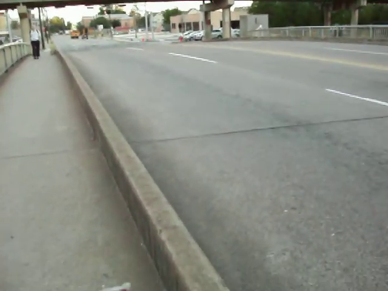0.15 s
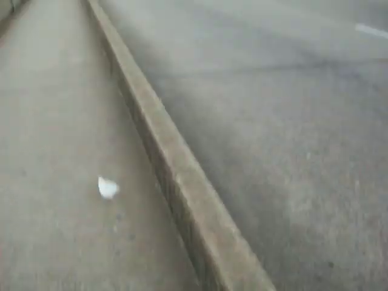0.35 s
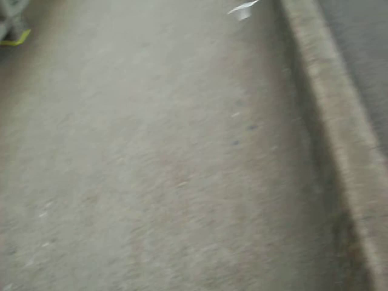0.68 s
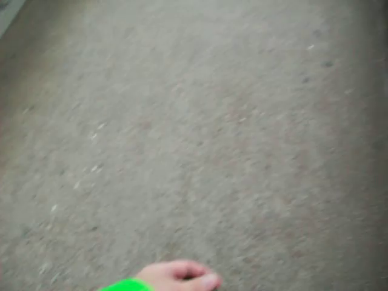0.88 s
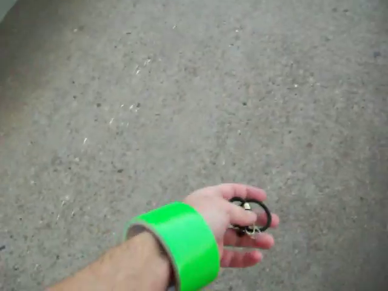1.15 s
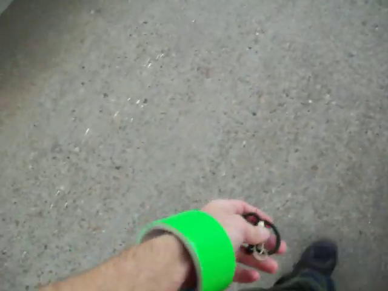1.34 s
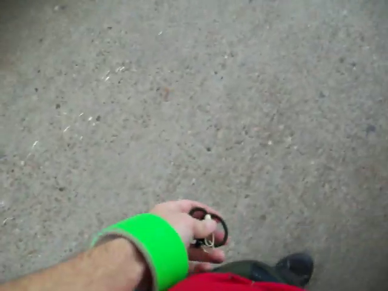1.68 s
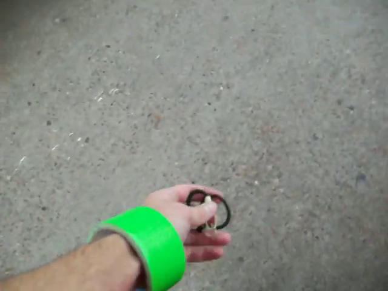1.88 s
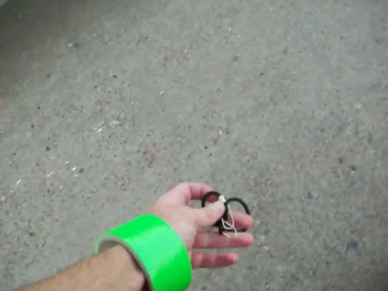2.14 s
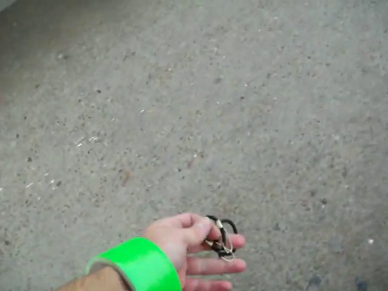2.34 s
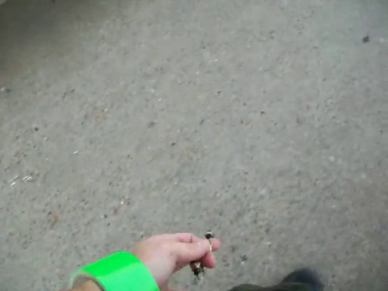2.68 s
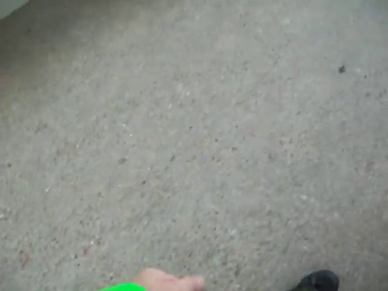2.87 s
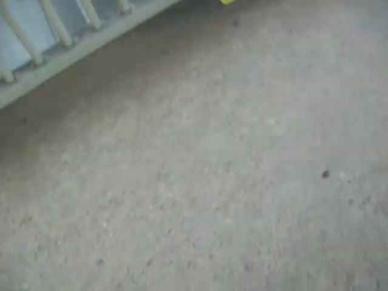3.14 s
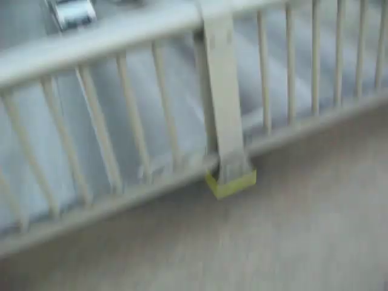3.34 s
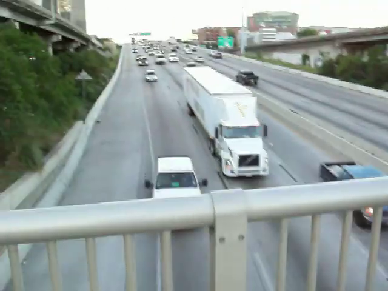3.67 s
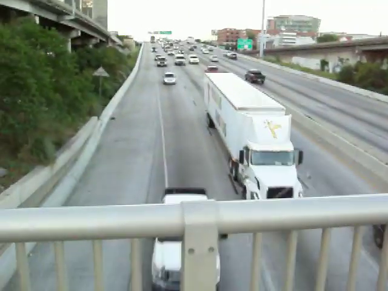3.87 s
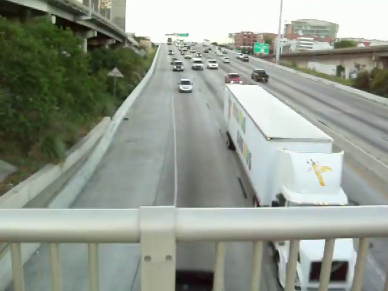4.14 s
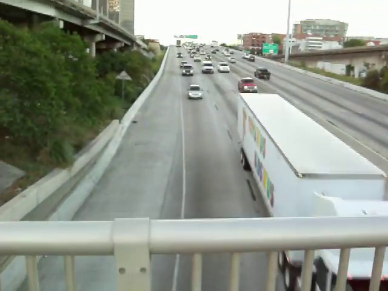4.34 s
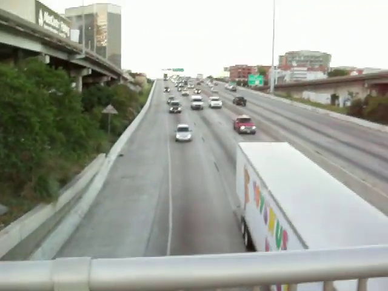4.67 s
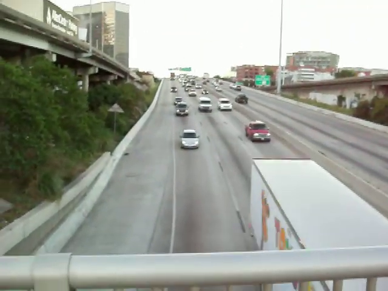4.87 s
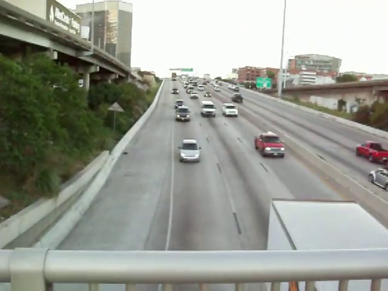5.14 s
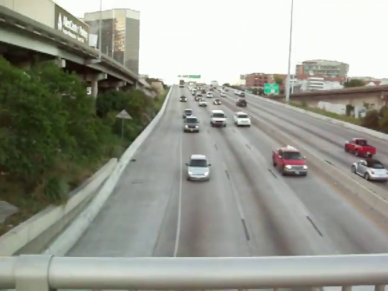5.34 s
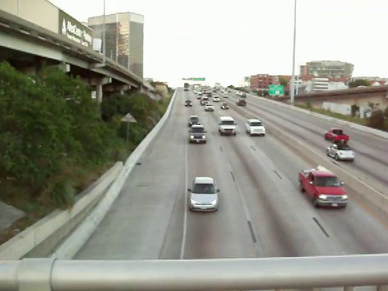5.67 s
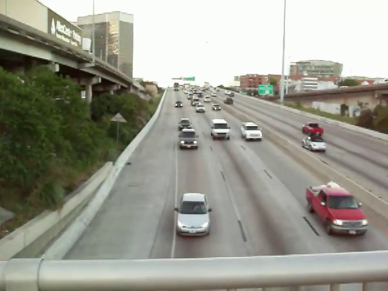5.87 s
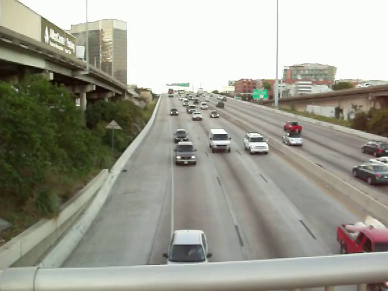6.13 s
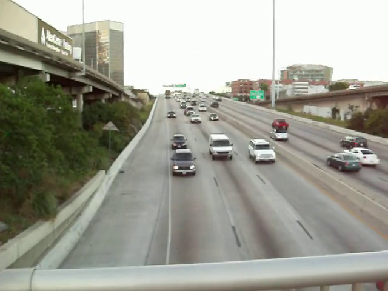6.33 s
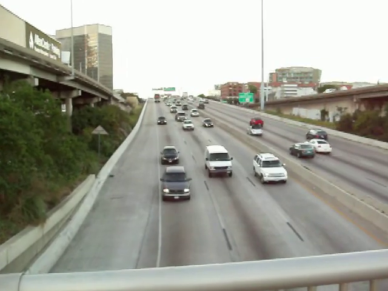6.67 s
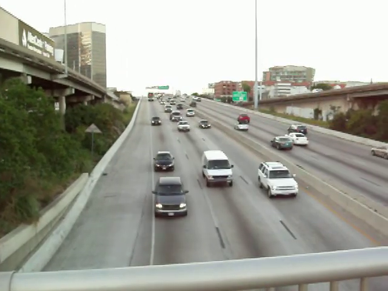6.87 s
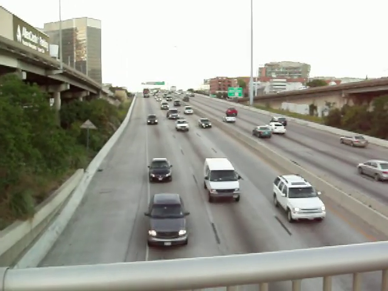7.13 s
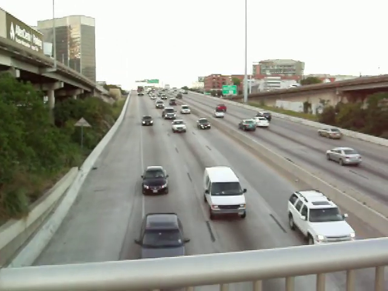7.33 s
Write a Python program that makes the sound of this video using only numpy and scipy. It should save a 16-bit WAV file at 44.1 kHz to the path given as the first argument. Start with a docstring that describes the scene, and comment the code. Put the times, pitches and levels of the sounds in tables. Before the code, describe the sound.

Dense freeway traffic roars steadily beneath an overpass, with singing tyres, a low diesel drone, faint key rustles and small overload clicks.

```python
"""Dense freeway traffic under an overpass: coloured noise bands roar throughout, tyres sing near 900 Hz,
and a diesel truck drones in harmonics, sinking from 117 to 98 Hz. Large vehicles swell in from the start;
the bridge deck dulls the lanes around 2.4 s, grainy noise rings as keys rustle in a hand from 3.3 to 3.7 s,
and a semi-trailer dulls the lanes around 4.6 s. A small camera holds the level steady, keeps mainly
the band below 6 kHz and ticks at set moments from 0.8 to 6.6 s, where the wave is driven into overload."""
import sys
import numpy as np
from scipy import signal
from scipy.fft import rfft, irfft
from scipy.io import wavfile
from scipy.ndimage import uniform_filter1d

SR = 44100
rng = np.random.default_rng(int(sys.argv[2]) if len(sys.argv) > 2 else 0)


def store_wav(level_fs):
    """Save 16-bit WAV to argv[1]."""
    pcm = np.round(np.clip(np.atleast_2d(level_fs), -1, 1) * 32767)
    wavfile.write(sys.argv[1], SR, pcm.T.astype(np.int16))


N = 330750
TIME = np.arange(N) / SR
FREQS = np.fft.rfftfreq(N, 1 / SR) + 1e-3  # the offset keeps the logarithm finite at 0 Hz

# All levels are those of the mix, ahead of the camera's gain control.
# A length spans the two points where a swell is 6 dB down.

# spectral shape of the whole stream of traffic: [f/Hz, relative level/dB]
ROAD_COLOUR = [(12, -24.5), (22, -8.5), (70, -7), (115, -3.5), (165, -8), (240, -7.5), (430, -10.5),
               (740, -9), (900, -4.5), (1020, -9), (1170, -17.5), (1450, -19.5), (1800, -28.5)]
# spectral shape of air pumped out of the treads: [f/Hz, relative level/dB]
HISS_COLOUR = [(1000, -23), (1700, -1.5), (2100, 1), (2700, 2), (3250, -6.5), (3850, -8), (4400, -14),
               (5100, -17.5), (5800, -16.5)]
# steady levels of the stream of traffic, level/dB
RUMBLE_DB, BODY_DB, TYRE_DB, HISS_DB = -28, -27, -20.5, -35
# low roar of single large vehicles: [closest t/s, length t/s, rumble level/dB, body roar level/dB]
LARGE_VEHICLES_PASSING = [(.35, 0.79, -29.5, -25.5), (1.1, 0.38, -29.5, -26), (2.499, 2.2, -35, -23),
                          (4.001, 1.62, -24.5, -29.5), (5.45, .35, -25, -38), (6.15, 0.83, -29, -34)]
# the bridge deck screens the lanes below from the walkway: deepest t/s, length t/s
SCREEN_S, SCREEN_LENGTH_S = 2.4, 2.2
# the semi-trailer screens the lanes behind it: deepest t/s, length t/s
TRAILER_S, TRAILER_LENGTH_S = 4.55, 1.7
# diesel exhaust: [t/s, firing rate f/Hz, level/dB before the trim in diesel()]
DIESEL_EXHAUST = [(0.0, 116.9, -23), (0.24, 116.4, -30.5), (0.72, 103.1, -22), (0.96, 106.0, -29.5),
                  (1.08, 106.1, -30), (1.32, 107.4, -21.0), (1.92, 107.8, -24.5), (2.64, 101.5, -21),
                  (3.48, 103.3, -25.5), (3.6, 103.0, -31.5), (4.32, 100.3, -20.5), (4.56, 100.6, -31.5),
                  (4.8, 99.4, -18), (5.4, 98.4, -24.5), (5.88, 98.8, -23.5), (6.12, 98.6, -35.5),
                  (6.48, 99.2, -23.5), (6.6, 98.2, -32), (7.2, 99.2, -23.5), (7.49, 98.2, -25.5)]
# other engines humming by: [loudest t/s, length t/s, pitch f/Hz, glide Hz/s, width f/Hz, level/dB]
ENGINE_HUMS = [ (0.144, 1.2, 126.6, -9, 16, -32), (1.6, 1, 301, 0, 19, -32),
               (2.449, 1.07, 334.6, -3, 2, -28.5), (2.3, .8, 327.7, -20, 110, -29),
               (3.1, .8, 580, -60, 83, -27.5), (3.55, 0.81, 279.5, -25, 40, -30),
               (4.294, 0.34, 66, 8.5, 12, -32), (4.495, .6, 354, 1.5, 70, -29.5),
               (6.8, 1.8, 315, -5, 60, -34), (5.801, 2.2, 122.3, 6, 11, -29.5),
               (6.7, 2, 224.6, -5, 75, -27.5)]
# tyre treads singing by: [loudest t/s, length t/s, pitch f/Hz, level/dB]
TREAD_TONES = [(.3, .46, 734, -27.5), (0.799, .42, 912, -22.5), (1.494, 0.32, 906, -25),
               (2.0, 2.1, 859.8, -26.5), (2.198, 0.4, 901, -25), (3.548, 0.41, 948, -26.5),
               (4.5, 0.55, 960, -30), (5.15, 0.99, 828, -27), (6.6, 1.0, 943, -26.5),
               (6.799, 0.39, 848, -24.5)]
# every tread tone is equally unsteady and sinks with the Doppler shift
TREAD_WIDTH_HZ, TREAD_SAG_HZ_PER_S = 15, 12
# close tyres sizzling past: [loudest t/s, length t/s, centre f/Hz, width f/Hz, level/dB]
TYRE_SIZZLES = [(0.197, 0.9, 2280, 700, -37.5), (.88, 0.6, 2250, 704, -34.5), (2.197, .5, 2310, 500, -39.5),
                (3.62, 0.5, 2890, 400, -38.5), (5.4, .5, 3770, 1630, -48.5), (6.904, 1.4, 3620, 1400, -50)]
# keys shifting in the hand: [loudest t/s, length t/s, pitch f/Hz, level/dB]
KEY_RINGS = [(3.296, 0.068, 4800, -34.5), (3.423, 0.084, 5200, -36), (3.54, 0.07, 4620, -32.5),
             (3.686, 0.12, 4860, -43)]
# crests that overload the camera: [t/s, converter samples that wrap around]
OVERLOAD_TICKS = [(.8371, 1), (1.3816, 1), (2.4397, 1), (3.8099, 2), (4.07082, 2), (4.07108, 1),
                  (5.0949, 2), (5.3748, 2), (5.66, 1), (6.039, 1), (6.6104, 1)]
# the camera: largest wave value, band edge of the converter f/Hz, final top cut f/Hz
FULL_SCALE, BAND_HZ, TOP_HZ = .72, 5550, 15900


def traffic(far_db=-29.0, far_share=0.76, flicker_db=1.32, hiss_flicker_db=1.63):
    """Many vehicles blend into rumble, body roar, tyre roar and hiss; moving air makes each part flicker."""
    rumble, body, tyres, hiss = flow()
    far = far_db + far_share * (rumble - RUMBLE_DB)  # rises partly with the rumble
    road = colour(ROAD_COLOUR)
    parts = [
        (road * below(90), rumble),
        (road * above(100) * below(255), far),
        (road * above(258) * below(772), body),
        (road * above(751) * below(1830), tyres)]
    mix = np.zeros(N)
    for gain, db in parts:
        mix += noise(gain) * undb(db + flicker_db * walk(49))
    tread_air = noise(colour(HISS_COLOUR) * above(1200))
    return mix + tread_air * undb(hiss + hiss_flicker_db * walk(28))


def flow(deck_tyre_db=-1.5, deck_hiss_db=-2.0, trailer_tyre_db=-2.0, trailer_hiss_db=-1.1):
    """Levels in dB of the stream: large vehicles add low power, obstacles screen the highs."""
    rumble_power, body_power = undb(RUMBLE_DB) ** 2, undb(BODY_DB) ** 2
    for s, length, rumble_db, body_db in LARGE_VEHICLES_PASSING:
        approach = swell(s, length)
        rumble_power = rumble_power + (undb(rumble_db) * approach) ** 2
        body_power = body_power + (undb(body_db) * approach) ** 2
    deck = swell(SCREEN_S, SCREEN_LENGTH_S)
    trailer = swell(TRAILER_S, TRAILER_LENGTH_S)
    tyres = TYRE_DB + deck_tyre_db * deck + trailer_tyre_db * trailer
    hiss = HISS_DB + deck_hiss_db * deck + trailer_hiss_db * trailer
    return 10 * np.log10(rumble_power), 10 * np.log10(body_power), tyres, hiss


def diesel(rough=0.18, wander_hz=0.8, second_db=-16, third_db=-19, trim_db=-1.15):
    """The exhaust drones at the firing rate with weak overtones; reflections off the road make it waver."""
    hz, db = curves(DIESEL_EXHAUST)
    phase = 2 * np.pi * np.cumsum(hz + wander_hz * walk(8)) / SR
    tone = np.sin(phase)
    tone += undb(second_db) * np.sin(2 * phase)
    tone += undb(third_db) * np.sin(3 * phase)
    wavering = tone * (1 + rough * walk(4))
    return unit(wavering) * undb(db + trim_db)


def passes():
    """Single engines hum and single sets of treads sing above the stream."""
    mix = np.zeros(N)
    for s, length, hz, glide, width_hz, db in ENGINE_HUMS:
        mix += passing_tone(s, length, hz, glide, width_hz, db)
    for s, length, hz, db in TREAD_TONES:
        mix += passing_tone(s, length, hz, -TREAD_SAG_HZ_PER_S, TREAD_WIDTH_HZ, db)
    return mix


def passing_tone(s, length, hz, glide, width_hz, db, clean_hz=12):
    """A narrow tone swells and glides as the vehicle moves; the narrower it is, the steadier its core."""
    phase = 2 * np.pi * np.cumsum(hz + glide * (TIME - s)) / SR
    spread = below(width_hz / 2, order=2)
    # slow noise on both quadratures smears the tone around its pitch
    in_phase = (clean_hz / width_hz + noise(spread)) * np.cos(phase)
    quadrature = noise(spread) * np.sin(phase)
    return unit(in_phase + quadrature) * swell(s, length) * undb(db)


def near_tyres():
    """Close tyres sizzle above the rest as they go by: resonant noise that swells and fades."""
    mix = np.zeros(N)
    for s, length, hz, width_hz, db in TYRE_SIZZLES:
        mix += noise(resonance(hz, width_hz)) * swell(s, length) * undb(db)
    return mix


def keys(width_hz=560, rough_db=3.5, scrape_db=-12):
    """Keys damped by the fingers slide over each other: short, grainy rings over a broad scrape."""
    mix = np.zeros(N)
    for s, length, hz, db in KEY_RINGS:
        scrape = undb(scrape_db) * above(3200, order=3)
        ring = noise(resonance(hz, width_hz) + scrape)
        grainy = unit(ring * undb(rough_db * walk(120)))
        mix += grainy * swell(s, length) * undb(db)
    return mix


def joints(count=110, decay_s=.005, db=-23, scatter_db=1.0):
    """Tyres slap the pavement joints at random: short decaying noise bursts half buried in the roar."""
    when, size = rng.random((count, 2)).T
    hits = np.zeros(N)
    hits[(when * (N - 1)).astype(int)] = undb(scatter_db * (2 * size - 1))
    decay = np.exp(-1 / (decay_s * SR))
    bursts = signal.lfilter([1], [1, -decay], hits)
    slap = noise(above(900, order=3) * below(1250, order=3))
    return slap * bursts * undb(db)


def scene():
    """Everything as it reaches the bridge."""
    mix = traffic() + diesel() + passes() + near_tyres() + joints() + keys()
    return mix[None]


def gain_control(x, target_db=-15, window_s=.12, strength=1.0):
    """The gain follows the running power and holds the level nearly constant."""
    power = uniform_filter1d(x ** 2, int(window_s * SR))
    return x * (undb(target_db) / np.sqrt(power)) ** strength


def flat_tops(x):
    """The wave bends smoothly into a ceiling at full scale."""
    size = np.abs(x) / FULL_SCALE
    return FULL_SCALE * np.tanh(size ** 4) ** .25 * np.sign(x)


def overload(x, crest_s=0.00033):
    """At each set tick the wave rises to full scale, then snaps across for a converter sample or two."""
    crest, snap = np.zeros(N), np.zeros(N)
    for s, samples in OVERLOAD_TICKS:
        centre = int(s * SR)
        near = centre + np.arange(-64, 65)
        lag = TIME[near] - TIME[centre]
        crest[near] = np.maximum(crest[near], np.exp(-(lag / crest_s) ** 2))
        # the converter's filter rounds the snap and rings at the band edge
        rounded = sum(np.sinc(2 * BAND_HZ * lag - k + (samples - 1) / 2) for k in range(samples))
        snap[near] += rounded * np.exp(-(lag / (2 * crest_s)) ** 2)
    raised = x + crest * (FULL_SCALE - x)
    snapped = np.clip(raised - 2 * FULL_SCALE * snap, -FULL_SCALE, FULL_SCALE)
    return np.where(crest > 0, snapped, x)


def record(dry):
    """The camera: gain control, flat tops, a narrow-band converter, overload ticks and the top cut."""
    levelled = gain_control(dry[0])
    narrow = irfft(rfft(levelled) * below(5400, order=22), N)
    band_cut = signal.ellip(10, .2, 90, BAND_HZ + 300, fs=SR, output="sos")
    converted = signal.sosfilt(band_cut, flat_tops(narrow))
    top_cut = signal.ellip(8, .2, 70, TOP_HZ, fs=SR, output="sos")
    return signal.sosfilt(top_cut, overload(converted))[None]


def undb(db):
    """Decibels to gain."""
    return 10 ** (np.asarray(db) / 20)


def unit(x):
    """Scale to rms 1."""
    return x / np.sqrt(np.mean(x ** 2))


def curves(table):
    """Each column of a table as a line through time."""
    s, *columns = np.transpose(table)
    return [np.interp(TIME, s, column) for column in columns]


def colour(points):
    """Gain at every frequency from [f/Hz, level/dB] points, joined along a log frequency axis."""
    hz, db = np.transpose(points)
    return undb(np.interp(np.log(FREQS), np.log(hz), db))


def below(hz, order=8):
    """Gain of a low-pass."""
    return 1 / np.sqrt(1 + (FREQS / hz) ** (2 * order))


def above(hz, order=8):
    """Gain of a high-pass."""
    return 1 / np.sqrt(1 + (hz / FREQS) ** (2 * order))


def resonance(hz, width_hz):
    """Gain of one resonant peak, 6 dB down at the edges of its width."""
    return 1 / (1 + (2 * (FREQS - hz) / width_hz) ** 2)


def noise(gain):
    """Noise of rms 1 with the given colour."""
    return unit(irfft(rfft(rng.standard_normal(N)) * gain, N))


def walk(rate_hz):
    """Slow chance: low-passed noise with spread 1."""
    return noise(below(rate_hz, order=2))


def swell(s, length):
    """A bell that is 6 dB down half a length from its centre."""
    return .5 ** ((2 * (TIME - s) / length) ** 2)


dry = scene()
out = record(dry)
store_wav(out)
```